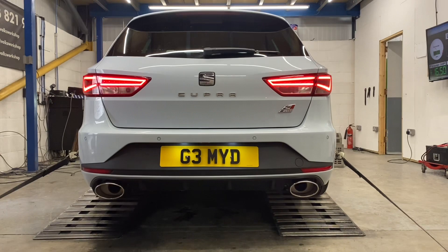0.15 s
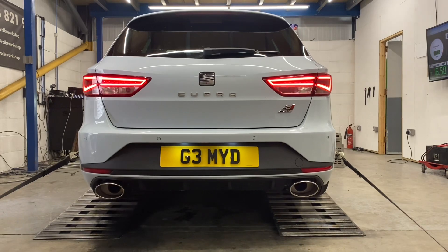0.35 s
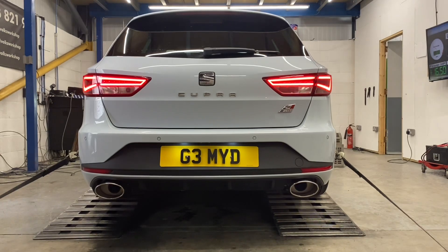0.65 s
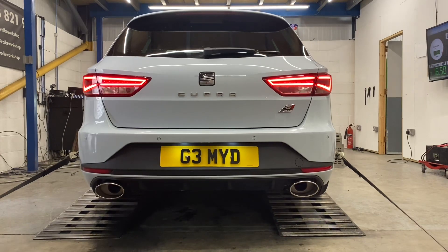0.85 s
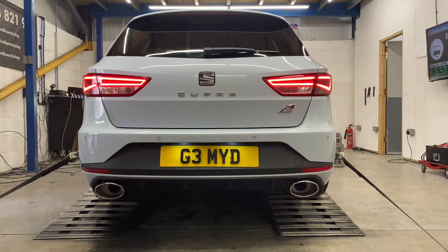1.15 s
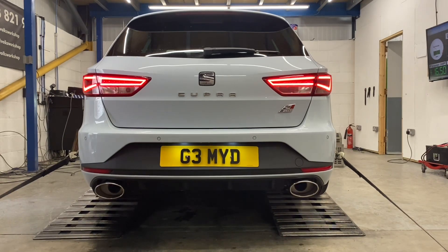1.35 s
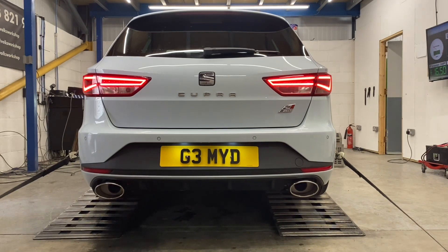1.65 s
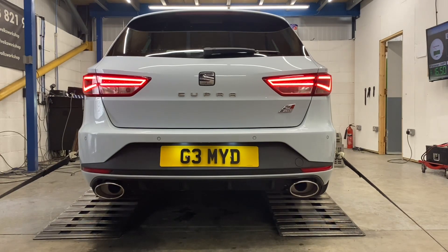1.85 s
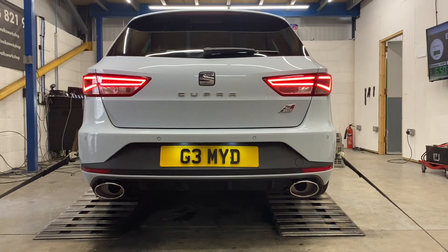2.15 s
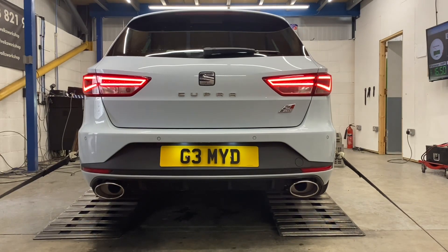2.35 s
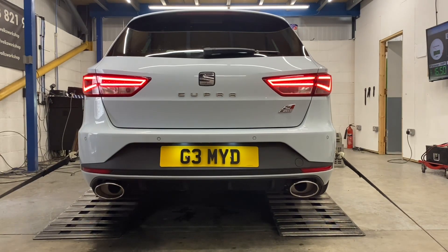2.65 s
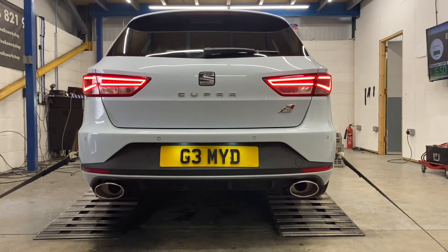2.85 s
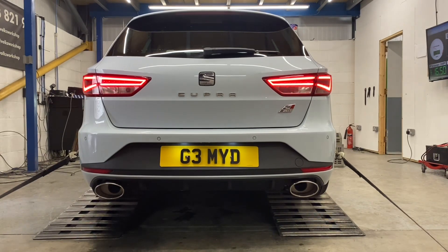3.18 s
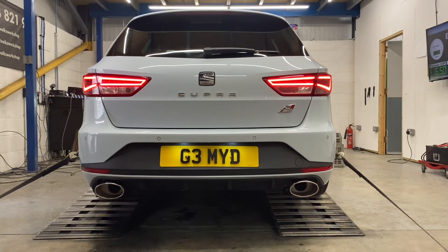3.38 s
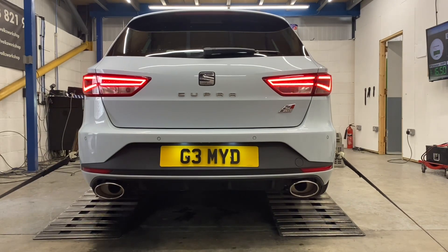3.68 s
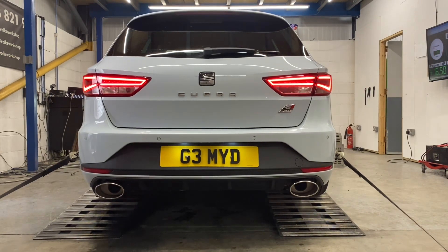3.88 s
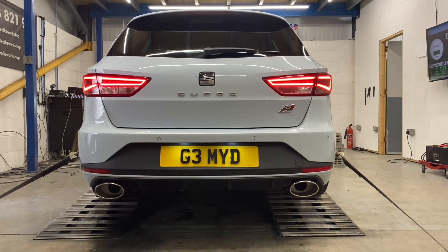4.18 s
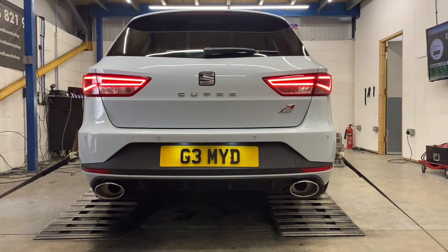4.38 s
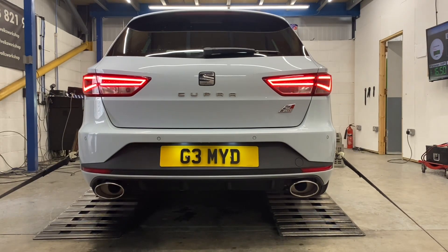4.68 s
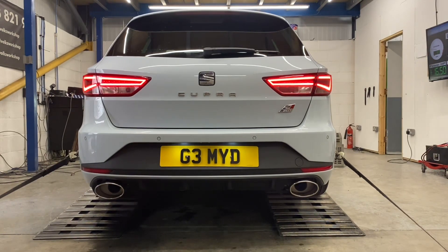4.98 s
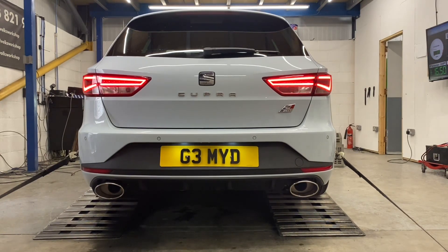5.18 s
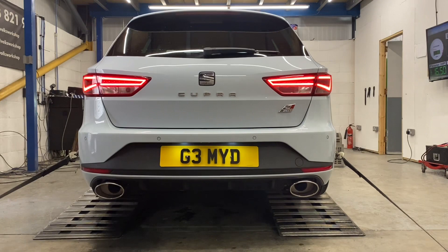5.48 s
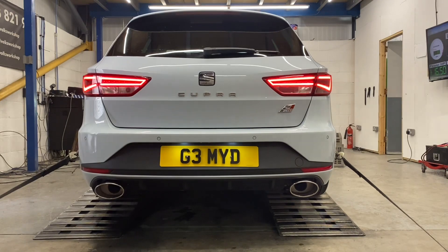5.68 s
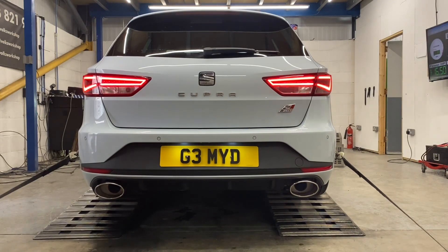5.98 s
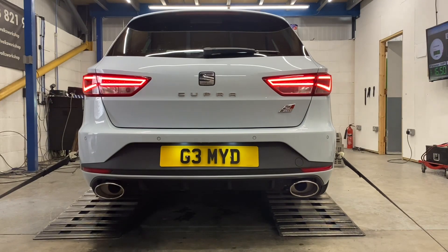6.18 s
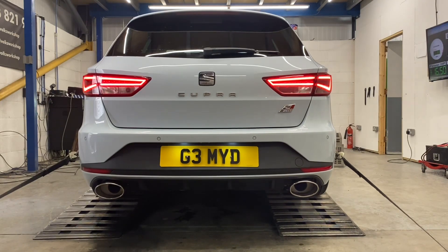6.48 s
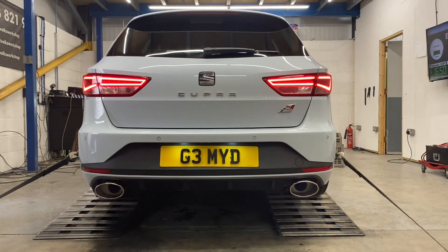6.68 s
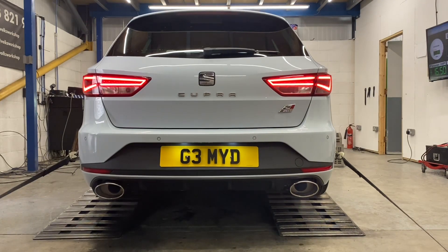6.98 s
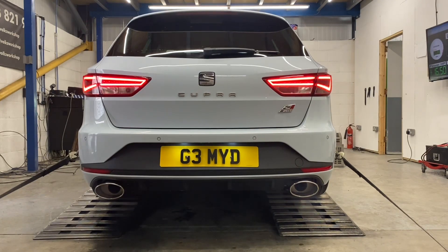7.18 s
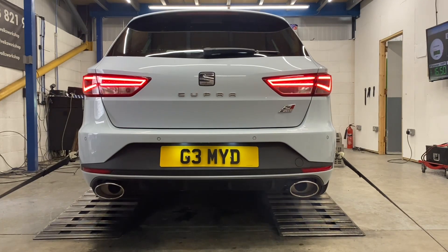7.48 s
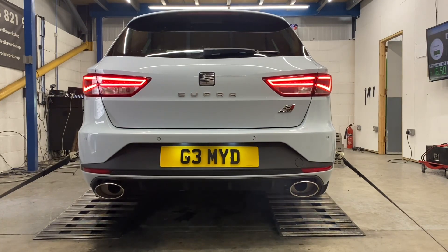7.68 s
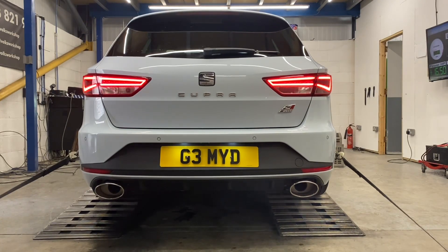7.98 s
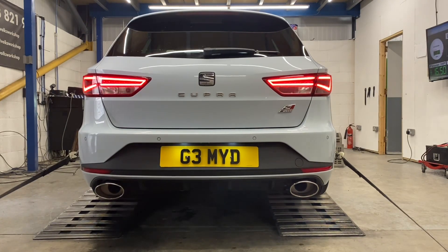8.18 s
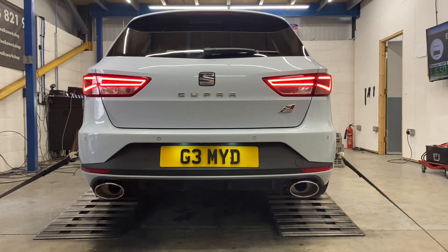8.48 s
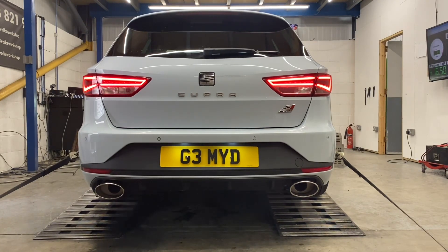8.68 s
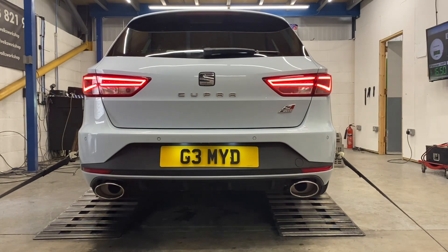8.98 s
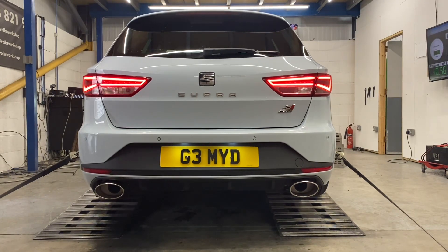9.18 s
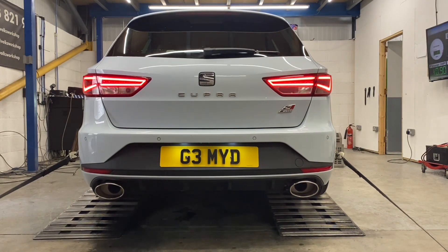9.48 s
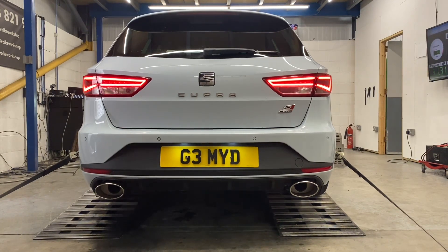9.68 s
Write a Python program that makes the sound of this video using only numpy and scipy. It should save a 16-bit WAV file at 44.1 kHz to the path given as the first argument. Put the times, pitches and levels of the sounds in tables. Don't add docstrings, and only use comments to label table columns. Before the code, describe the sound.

A car slows on a workshop rolling road, heard close from the rear. Two driven tyres sing on ridged rollers, a rough paired whine gliding downward over tyre roar and fan noise. The exhaust burbles with scattered pops, barks through a brief throttle blip, then booms and crackles more heavily. Finally it settles into a smooth low drone that hardens under throttle, with echo from the walls.

```python
import sys
import numpy as np
from scipy import signal
from scipy.fft import rfft, irfft
from scipy.io import wavfile
from scipy.ndimage import uniform_filter1d

SR = 44100
rng = np.random.default_rng(int(sys.argv[2]) if len(sys.argv) > 2 else 0)


def attenuation_scalar(level_db):
    decades = np.asarray(level_db, float) / 20
    return 10 ** decades


def wav_record(signal):
    frames = np.transpose(np.atleast_2d(signal))
    bounded = np.clip(frames, -1, 1)
    quanta = np.round(bounded * 32767).astype(np.int16)
    wavfile.write(sys.argv[1], SR, quanta)


N = 433944
T = np.arange(N) / SR
F = np.fft.rfftfreq(N, 1 / SR)
SIDES = np.array([[1], [-1]])

# [t/s, firing pulse level/dB, throttle opening/0-1]
THROTTLE = [(0, -25, 0.1), (.35, -23.5, .05), (1.0, -26, 0.11), (2.45, -32, .1), (2.58, -24.5, 0.71),
            (2.72, -15.5, 0.85), (2.8, -14.5, 0.84), (2.86, -26, .6), (2.97, -22, 0.61), (3.4, -20, 0),
            (4.0, -24, .05), (5.8, -36, 0.23), (6.5, -27, 0.08), (7.1, -28.5, 0.08), (8.0, -26.5, 0.44),
            (9.3, -26, 0.48), (9.7, -24.5, 0.94), (9.84, -23, .9)]
# [order, level over pulse when shut/dB, gain wide open/dB, gain while fuelled/dB]
ORDERS = [(1, 1, -5.5, 1.2), (2, -6, 7.5, 0.34), (3, -11.5, 18, -0.5), (4, -21, 21.5, 4),
          (5, -21.5, 17.5, 8), (6, -22.5, 23, 3.5), (7, -21, 19, 6), (8, -17.5, 14.5, 10), (9, -30, 16, 0),
          (10, -31, 24, 1)]
# [start t/s, end t/s, crank order level/dB, burble level/dB, boom level at 100 firings/s /dB]
FUEL_CUTS = [
    (-.3, 2.52, -27, -28, -44),
    (3.2, 6.42, -24, -26.5, -30.5),
]
FUELLED_DB = -20, -20, -25
# [t/s, peak level/dB]
POPS = [(1.055, -28), (1.108, -22), (1.349, -25), (1.599, -16), (1.771, -10), (1.892, -11.5), (2.001, -41),
        (2.189, -25), (2.307, -21), (2.419, -14), (2.464, -36), (2.545, -11), (3.954, -11.5), (4.193, -14),
        (4.37, -25), (4.441, -5.5), (4.626, -16), (4.993, -24), (5.042, -10), (5.091, -21), (5.171, -13),
        (5.254, -9), (5.404, -31), (5.465, -14), (5.541, -9), (5.63, -16), (5.683, -15), (5.991, -10),
        (6.086, -27), (6.376, -19)]
# [f/Hz, width/Hz, level/dB]
PIPE_MODES = [(62.6, 1.17, 10), (100.4, 35.2, 3.5), (131.5, 16.4, 5), (228, 18.5, 1), (252.5, 25.7, 0.5),
              (327, 17, -4), (373.5, 7.4, -10.5), (414, 14.6, -9), (464.3, 21.8, -3.5), (532, 60, -14.5),
              (663, 28, -14.5), (760, 64, -48)]
GEARS = .0349, .0472
# [t/s, knurl rate f/Hz, whine level/dB]
ROLLERS = [(0.0, 3758, -0.5), (0.4, 3615, 0.4), (1.2, 3345, 0.6), (2.0, 3074, 0), (2.5, 2886, -1.5),
           (3.2, 2759, 1), (4.0, 2498, -1), (4.8, 2223, -0.7), (5.6, 1953, -1), (6.4, 1696, -1.5),
           (6.75, 1627, 0.2), (7.2, 1583, 0.5), (7.8, 1578, 0.6), (8.6, 1590, 2.5), (9.2, 1609, 3.5),
           (9.6, 1633, 4.5), (9.84, 1669, 4)]
# [t/s, share of speed each wheel leaves the mean, faster wheel over mean level/dB]
SLIP = [(0, .0127, 0), (3.6, .013, 0), (6, .0145, 1), (6.8, .0105, 4), (7.6, .007, 9), (8, .006, 10),
        (9.84, .005, 10)]
PARTIALS_DB = -0.64, -3.5, -5.5, -6.5, -11.5, -13, -17, -21, -19
# [f/Hz, level of a partial there/dB]
WHINE_COLOUR = [(1600, -35), (2400, -31), (3300, -34.5), (4800, -37.5), (6400, -36.5), (8000, -44),
                (10500, -46.5), (15000, -50)]
# [multiple of knurl rate, relative width, level over the partial above/dB]
TREAD = [(.73, 0.035, -20), (1.002, 0.11, -8.5), (1.27, 0.031, -13.5), (1.701, 0.085, -6.5),
         (2.001, 0.044, -1), (2.28, 0.045, -9.5), (2.701, 0.097, -6.5), (3.68, 0.12, -2)]
# [f/Hz, density level/dB per Hz]
ROAR_SPECTRUM = [(40, -4.5), (150, -3), (273, 0), (780, -5), (1080, -11), (1570, -12), (2280, -17),
                 (3240, -20.5), (3950, -23.5), (6500, -22), (8790, -28), (11600, -34.5), (13500, -46),
                 (14600, -29), (15700, -52)]
# [t/s, level/dB]
ROAR_LEVEL = [(0, -42), (3.5, -43.5), (5.2, -45), (7.3, -45), (9.0, -42), (9.84, -39.5)]
# [f/Hz, growth/dB per octave of speed]
ROAR_GROWTH = [(60, 4.5), (250, 1.9), (800, 3), (2000, 4), (5000, 3), (12000, 3)]
# [f/Hz, likeness/0-1]
ALIKE = [(60, 0.65), (130, 0.58), (290, 0.07), (640, 0.35), (1410, 0.15), (3100, 0.4), (6820, 0.42),
         (15000, 0.26)]
# [f/Hz, left minus right level/dB]
LEAN = [(60, -2.5), (110, 1.5), (200, -1.5), (380, 2.5), (700, 1.5), (1290, 2), (2380, 4.5), (4400, 11.5),
        (8120, 10), (15000, 15.5)]

SHIFT_S, SHIFT_LENGTH_S = 2.52, .27
SPIN = .015
CUT_IN_S, CUT_OUT_S = 0.048, 0.036
BURBLE_DB_OCT, BOOM_DB_OCT, BURBLE_TOP_HZ = -24, -7, 108
SHARPNESS = 1.14
HUMP_DB_OCT = 4.5
SHOP_T60_S, SHOP_DB = 1.2, -7
TOP_LEAD_S, SHARED_HZ = 1 / 3430, 7900


def exhaust():
    pulse_db, opening = curves(THROTTLE)
    firing_hz = revs(opening)
    crank_db, burble_db, boom_db = overrun(firing_hz)
    turns = np.cumsum(firing_hz * (1 + 0.002167 * walk(20))) / SR
    steady = drone(firing_hz, turns, pulse_db, opening, crank_db)
    kicks = late_firings(turns)
    pops = np.zeros(N)
    for s, db in POPS:
        pops[int(s * SR) + 40] = -attenuation_scalar(db)
    crack = pipe(pops, 1 / (1 + 1j * (F - 330 ** 2 / (F + 1)) / 450) ** 2)
    boom = pipe(kicks * attenuation_scalar(boom_db), modes(F)[0]) * attenuation_scalar(-12 * fuelled())
    burble = pipe(kicks * attenuation_scalar(burble_db + 4.0) + 12 * pops, sum(modes(F)))
    return steady + burble + boom + 1.7 * crack


def drone(firing_hz, turns, pulse_db, opening, crank_db):
    ring = np.sqrt(sum(abs(m) ** 2 for m in modes(F))) ** SHARPNESS
    crank_ring = np.interp(firing_hz / 2, F, abs(modes(F)[0])) ** 0.67
    orders = [(.5, attenuation_scalar(crank_db) * crank_ring)]
    for k, db, open_db, fuel_db in ORDERS:
        level = attenuation_scalar(pulse_db + db + open_db * opening + fuel_db * fuelled())
        rolloff = 1 + (k * firing_hz / 750) ** 4
        orders.append((k, level * np.interp(k * firing_hz, F, ring) / rolloff))
    out = np.zeros(N)
    for k, level in orders:
        wave = np.sin(k * (2 * np.pi * turns + 0.683 * k))
        out += level * attenuation_scalar(0.19 * walk(10)) * np.sqrt(2) * wave
    return out


def late_firings(turns):
    fired = np.flatnonzero(np.diff(np.floor(turns)))
    chance = rng.standard_normal((N // 100, 2))[:len(fired)]
    delay = (0.001448 * SR * chance[:, 1]).astype(int)
    kicks = np.zeros(N)
    kicks[np.clip(fired + delay, 0, N - 1)] = np.tanh(chance[:, 0]) * attenuation_scalar(0.49 * walk(9.9))[fired]
    return unit(kicks)


def modes(at_hz):
    return [(-1) ** k * attenuation_scalar(db) / (1 + 1j * (at_hz - hz ** 2 / (at_hz + 1)) / width)
            for k, (hz, width, db) in enumerate(PIPE_MODES)]


def revs(opening):
    shift = np.sin(ramp(SHIFT_S, SHIFT_LENGTH_S) * np.pi / 2) ** 1.3
    gear = GEARS[0] + (GEARS[1] - GEARS[0]) * shift
    return curves(ROLLERS)[0] * gear * (1 + SPIN * opening * (T > FUEL_CUTS[1][0]))


def overrun(firing_hz):
    columns = np.transpose(FUEL_CUTS)[2:]
    crank_db, burble_db, boom_db = [np.where(T < FUEL_CUTS[1][0], first, second) + db * fuelled()
                                    for (first, second), db in zip(columns, FUELLED_DB)]
    burble_hz = np.maximum(firing_hz, BURBLE_TOP_HZ)
    burble_db = burble_db + BURBLE_DB_OCT * np.log2(burble_hz / BURBLE_TOP_HZ)
    boom_db = boom_db + BOOM_DB_OCT * np.log2(firing_hz / 100) + 0.89 * walk(4)
    return crank_db, burble_db, boom_db


def fuelled():
    return 1 - sum(ramp(start, CUT_IN_S) - ramp(end, CUT_OUT_S) for start, end, *_ in FUEL_CUTS)


def rollers():
    knurl_hz, levels_db = whine()
    slip, lead_db = curves(SLIP)
    turns, split = np.cumsum(knurl_hz) / SR, np.cumsum(knurl_hz * slip) / SR
    song = np.zeros(N)
    for wheel in (-1, 1):
        squirm = .022 * walk(110) * knurl_hz / 3000 + .5 * walk(7)
        phase = turns + wheel * split + squirm
        for k, db in enumerate(levels_db, 1):
            wheel_db = lead_db * (wheel - .8) / min(k, 3)
            sway_db = 1.53 * walk(6) + 3.65 * walk(35) * knurl_hz / 3000
            in_band = np.clip((16000 - k * knurl_hz) / 200, 0, 1)
            song += attenuation_scalar(db + wheel_db + sway_db) * in_band * np.sin(2 * np.pi * k * phase)
    return .6 * song + shop(song, -3.0) + tread_humps(knurl_hz, levels_db, turns)


def whine():
    knurl_hz, whine_db = curves(ROLLERS)
    colour_db = along(WHINE_COLOUR)
    levels_db = [whine_db + db + np.interp(k * knurl_hz, F, colour_db)
                 for k, db in enumerate(PARTIALS_DB, 1)]
    return knurl_hz, levels_db


def tread_humps(knurl_hz, levels_db, turns):
    humps = np.zeros((2, N))
    for k, width, db in TREAD:
        partial_db = levels_db[int(np.ceil(k - .05)) - 1]
        level = attenuation_scalar(partial_db + db + HUMP_DB_OCT * np.log2(knurl_hz / 2600))
        level = level / (1 + (k * knurl_hz / 8000) ** 4)
        carrier = level * np.exp(2j * np.pi * k * turns)
        for side in range(2):
            humps[side] += (carrier * (walk(5000 * width) + 1j * walk(5000 * width))).imag
    return humps


def roar():
    alike = np.clip(along(ALIKE), 0, .99)
    mid, side = rfft(rng.standard_normal((2, N))) * attenuation_scalar(along(ROAR_SPECTRUM)) / np.sqrt(1 - alike)
    both = np.sqrt(1 + alike) * mid + np.sqrt(1 - alike) * side * SIDES
    both /= np.sqrt(np.mean(irfft(both * (F > 900) * (F < 1400), N) ** 2))
    knurl_hz, roar_db = curves(ROLLERS)[0], curves(ROAR_LEVEL)[0]
    growth_db_oct = along(ROAR_GROWTH)
    out = np.zeros((2, N))
    for centre_hz in 30 * 2 ** np.arange(0, 9.6, .5):
        window = np.clip(1 - abs(np.log2((F + 1) / centre_hz)) * 2, 0, 1)
        speed_db = np.log2(knurl_hz / 1600) * np.interp(centre_hz, F, growth_db_oct)
        sway_db = 1.0 * walk(9) + 0.9 * walk(1.4)
        out += irfft(both * window, N) * attenuation_scalar(roar_db + speed_db + sway_db)
    return out


def shop(x, wet_db):
    size = SR
    early = np.concatenate([x[size:0:-1], x])
    tails = rng.standard_normal((2, size)) * attenuation_scalar(-60 * T[:size] / SHOP_T60_S)
    mid, side = [rfft(signal.fftconvolve(early, tail / np.sqrt(np.sum(tail ** 2)))[size:size + N])
                 for tail in tails]
    apart = np.clip(F / 500, 0, 1)
    bass_cut = 1 + (190 / (F + 1)) ** 4
    return irfft((mid + apart * side * SIDES) * attenuation_scalar(wet_db) / np.sqrt(2) / bass_cut, N)


def pipe(x, gain):
    return irfft(rfft(x) * gain / np.sqrt(np.mean(abs(gain) ** 2)), N)


def curves(table):
    s, *columns = np.transpose(table)
    return [np.interp(T, s, c) for c in columns]


def along(table):
    hz, value = np.transpose(table)
    return np.interp(np.log(F + 1), np.log(hz), value)


def ramp(start_s, length_s):
    return np.clip((T - start_s) / length_s, 0, 1)


def unit(x):
    return x / np.sqrt(np.mean(x ** 2))


def walk(rate_hz):
    k = max(int(SR / rate_hz), 1)
    held = np.repeat(rng.standard_normal(N // 8)[:N // k + 1], k)
    return unit(uniform_filter1d(uniform_filter1d(held, k), k)[:N])


def scene():
    pipes = exhaust()
    return pipes + shop(pipes, SHOP_DB) + rollers() + roar()


def low_pass(x):
    return signal.sosfilt(signal.butter(12, 15750, fs=SR, output="sos"), x)


def record(dry):
    left, right = rfft(dry) * attenuation_scalar(along(LEAN) * SIDES / 2)
    top = np.clip((F - SHARED_HZ) / 300, 0, 1)
    late_right = right * np.exp(-2j * np.pi * F / SR)
    early_left = left * np.exp(2j * np.pi * F * TOP_LEAD_S)
    right = (1 - top) * late_right + top * (early_left + 0.7 * right)
    rumble_cut = 1 + (48 / (F + 1)) ** 8
    mix = irfft(np.array([left, right]) / rumble_cut, N)
    return low_pass(mix)


dry = scene()
out = record(dry)
wav_record(out)
```